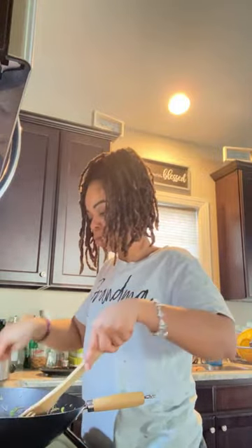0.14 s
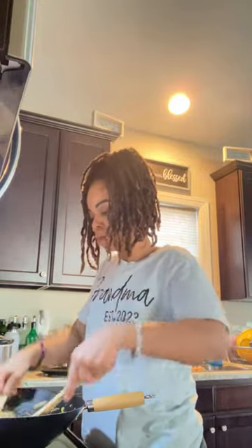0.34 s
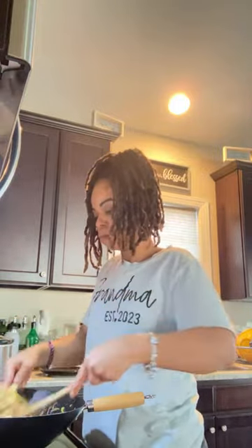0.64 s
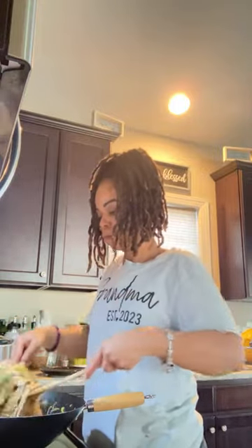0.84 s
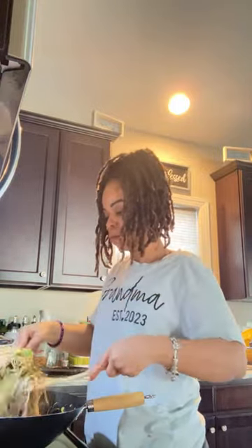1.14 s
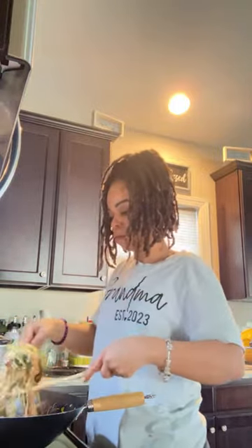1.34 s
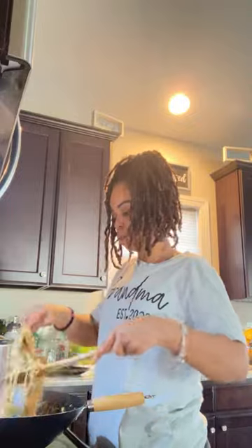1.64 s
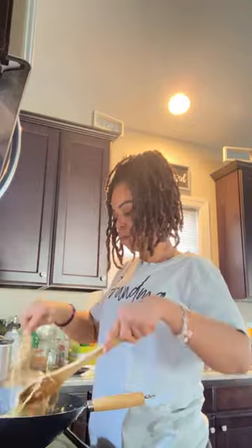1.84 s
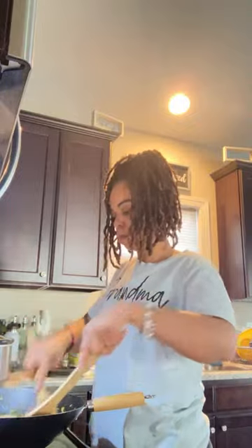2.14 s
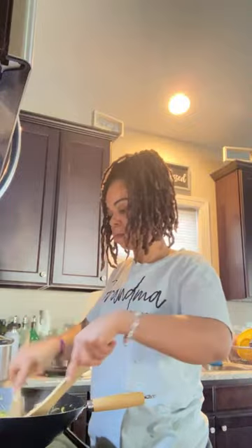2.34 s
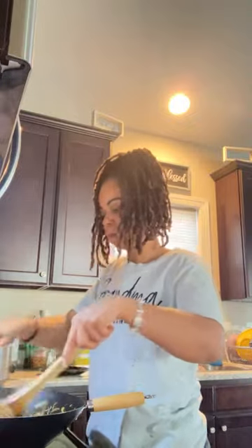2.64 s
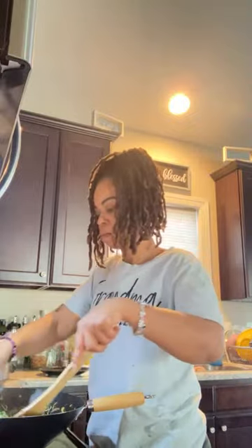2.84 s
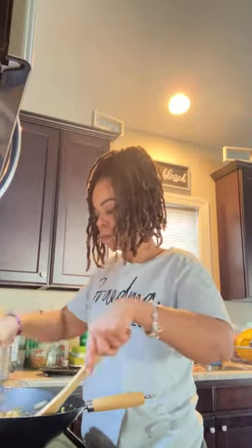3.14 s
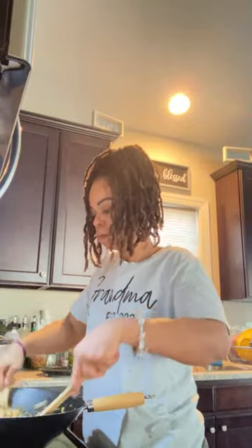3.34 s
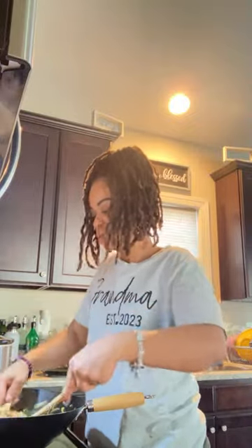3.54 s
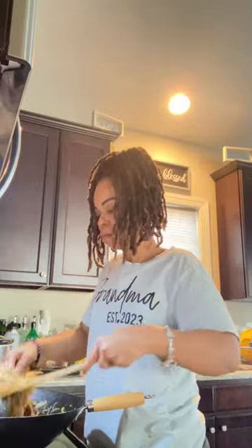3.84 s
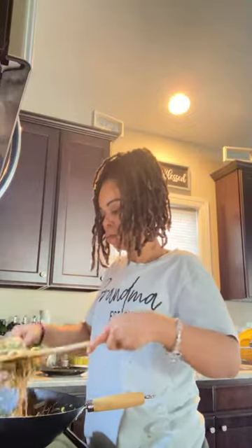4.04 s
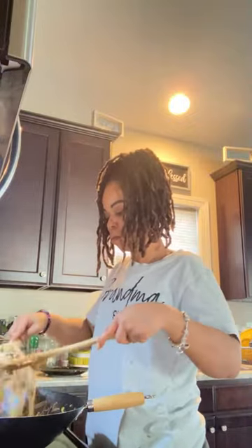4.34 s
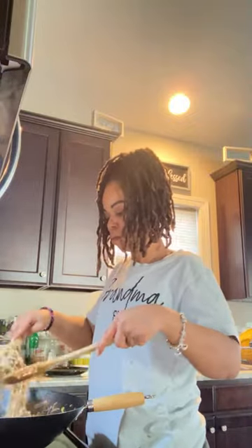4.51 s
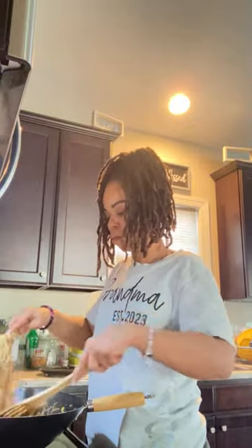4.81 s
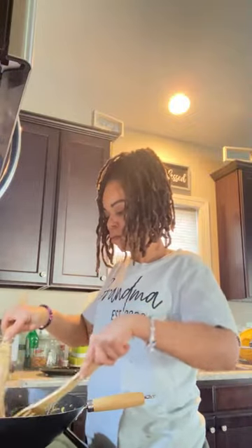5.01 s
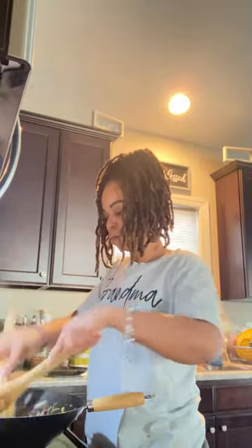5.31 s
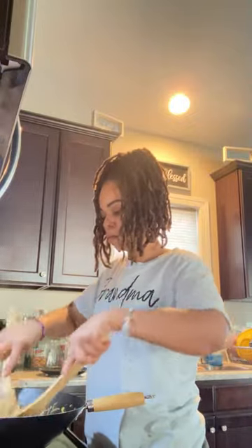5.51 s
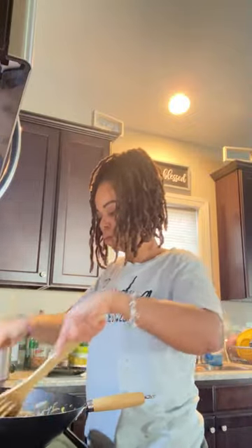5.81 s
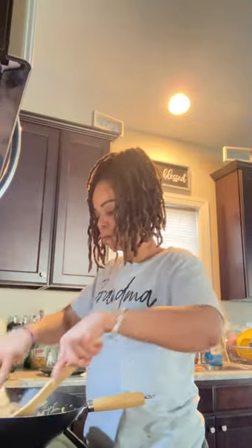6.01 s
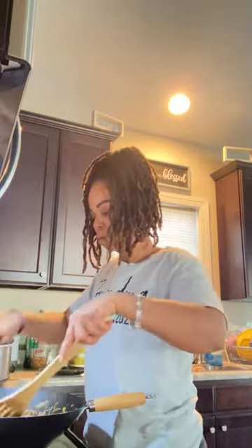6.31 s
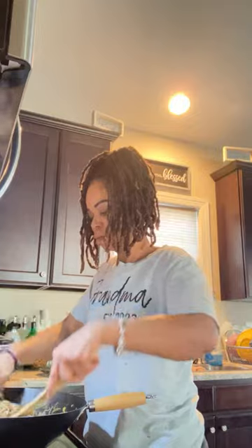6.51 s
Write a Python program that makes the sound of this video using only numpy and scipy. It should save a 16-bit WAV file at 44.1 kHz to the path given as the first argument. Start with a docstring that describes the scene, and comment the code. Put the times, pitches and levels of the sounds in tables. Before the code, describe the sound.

Wooden tools scrape, knock and toss noodles in a sizzling steel wok, with low pan thumps over a faint wavering hood-fan hum in a kitchen.

```python
"""Wooden tools stir and toss noodles in a hot steel wok, in a kitchen, heard by one microphone.
The tools knock rim, wood and bowl into damped modes and rub the steel as flickering coloured noise.
The pan rocks on its stand as short low tones; oil sizzles, fizzes and spits as bright noise.
Underneath, a hood fan hums on multiples of its shaft rate and its air rushes low.
The kitchen's short reverberation answers the knocks."""
import sys
import numpy as np
from scipy import signal
from scipy.fft import rfft, irfft, next_fast_len
from scipy.io import wavfile
from scipy.ndimage import uniform_filter1d, map_coordinates

SR = 44100
rng = np.random.default_rng(int(sys.argv[2]) if len(sys.argv) > 2 else 0)


def store_wav(level_fs):
    """Save 16-bit WAV to argv[1]."""
    pcm = np.round(np.clip(np.atleast_2d(level_fs), -1, 1) * 32767)
    wavfile.write(sys.argv[1], SR, pcm.T.astype(np.int16))


N = 293704


def amp(db):
    """Gain of a level in dB."""
    return 10 ** (np.asarray(db) / 20)


def unit(x):
    """x brought to rms 1."""
    return x / np.sqrt(np.mean(x ** 2) + 1e-20)


def summed(*gains):
    """Unrelated sounds add in power."""
    return np.sqrt(sum(g ** 2 for g in gains))


def along(points, hz):
    """Values at hz, read from (f/Hz, value) points on a log frequency axis."""
    f, value = np.transpose(points)
    return np.interp(np.log(hz + 1), np.log(f + 1), value)


def curves(rows):
    """One value per sample for each column after the time."""
    s, *columns = np.transpose(rows)
    return [np.interp(np.arange(N) / SR, s, column) for column in columns]


def wobble(rate):
    """A smooth random curve, rate knots a second."""
    knots = rng.standard_normal(int(N * rate / SR) + 4)
    return map_coordinates(knots, [np.arange(N) * rate / SR])


def filtered(x, response):
    """x shaped by a real or complex response of frequency."""
    m = next_fast_len(len(x) + 8192)
    return irfft(rfft(x, m) * response(np.fft.rfftfreq(m, 1 / SR)), m)[:len(x)]


def noise_band(length, centre_hz, fall_db):
    """Noise of rms 1 around a centre, falling by fall_db times the squared distance in octaves."""
    raw = rng.standard_normal(length)
    return unit(filtered(raw, lambda hz: amp(-fall_db * np.log2((hz + 1) / centre_hz) ** 2)))


def rush(spectrum, patchy_db, grit_db):
    """Coloured noise of rms 1 with patches of random gain; grit makes it grainy."""
    raw = rng.standard_normal(N) * amp(grit_db * wobble(400))
    z = signal.stft(raw, nperseg=512)[2]
    # patches: random gain smoothed over neighbouring frequencies, then over time
    field = uniform_filter1d(rng.standard_normal(z.shape), size=3, axis=0)
    field = uniform_filter1d(field, size=9, axis=1)
    x = signal.istft(z * amp(patchy_db * unit(field)), nperseg=512)[1][:N]
    return unit(filtered(x, lambda hz: amp(along(spectrum, hz))))


def sputter(count, life_ms, size_db):
    """Gain that jumps up at count random moments and dies back with a time constant of life_ms."""
    biggest_jump_db = 5.5  # cap on each single jump
    when, size = rng.random((count, 2)).T
    jump_db = np.minimum(-size_db * np.log(size), biggest_jump_db)
    kicks = np.bincount((when * N).astype(int), amp(jump_db) - 1, N)
    return 1 + signal.lfilter([1], [1, -np.exp(-1000 / (life_ms * SR))], kicks)


def ring(modes, centre_hz=1000, favour_db=0):
    """Sum of decaying modes at slightly new strengths; each octave from the centre costs favour_db."""
    scatter_db = 1.5  # from blow to blow
    longest_t60_s = 0.06  # the food damps every mode
    t = np.arange(SR // 10) / SR
    out = np.zeros(len(t))
    for hz, db, t60 in modes:
        strength_db = db - favour_db * abs(np.log2(hz / centre_hz)) + rng.normal(0, scatter_db)
        decay_db = -60 * t / min(t60, longest_t60_s)
        out += amp(strength_db + decay_db) * np.sin(2 * np.pi * (hz * t + rng.random()))
    return out


def add(track, s, sound):
    """Mix a sound in at s seconds."""
    part = track[round(s * SR):][:len(sound)]
    part += sound[:len(part)]


# Reverberation of the kitchen: f/Hz, t60/s
KITCHEN_DECAY = [(150, 0.4), (1000, 0.43), (5000, 0.71), (14000, 0.38)]


def room(x):
    """The kitchen's answer, 300 samples late; each frequency dies at its own speed."""
    hz, t, z = signal.stft(rng.standard_normal(SR // 2), SR, nperseg=256)
    decay = amp(-60 * t / along(KITCHEN_DECAY, hz)[:, None])
    tail = signal.istft(z * decay, SR, nperseg=256)[1]
    return signal.fftconvolve(np.pad(x, (300, 0)), tail / np.linalg.norm(tail))


# Wavering hum of the hood fan: t/s, level of the third shaft order/dB
FAN_LEVEL = [(0, -62.5), (.5, -60), (.65, -58.5), (1.5, -59), (1.65, -67), (2.1, -72.5), (2.5, -65),
             (3.1, -60), (3.8, -56.5), (4.1, -62.5), (4.5, -77), (4.8, -67), (5.1, -61), (5.5, -58),
             (5.75, -60), (5.95, -59.5), (6.66, -58.5)]
# Shaft orders of the hum: multiple of the shaft rate, level against the third order/dB
SHAFT_ORDERS = [(2, -11), (3, 0), (4, -15), (5, -15), (6, -16), (8, -23), (9, -24)]


def fan():
    """Shaft orders of the hood motor, each wavering in strength and phase; the third leads."""
    shaft_hz = 52.14
    level_db, = curves(FAN_LEVEL)
    turn = 2 * np.pi * shaft_hz * np.arange(N) / SR
    hum = np.zeros(N)
    for k, db in SHAFT_ORDERS:
        strength = amp(db + 1.4 * wobble(3.57))
        hum += strength * np.sin(k * turn + 0.11 * k * wobble(5))
    return np.sqrt(2) * amp(level_db) * hum


def shudder():
    """Gain of the low rumble that every knock sends through pan and stove."""
    rise_s, t60_s = 0.01, 0.47
    gains = []
    for s, *columns in KNOCK_EVENTS:
        since = np.clip(np.arange(N) / SR - s, 0, None)
        shudder_db = columns[4]
        gains.append(amp(shudder_db - 60 * since / t60_s) * (1 - np.exp(-since / rise_s)))
    return summed(*gains)


# Spectrum of the low air and rumble: f/Hz, relative level/dB
LOW_SPECTRUM = [(25, -27), (50, -10), (75, -7.5), (100, 1.5), (140, 1), (185, -12), (260, -5.5),
                (340, -13.5), (450, -20), (600, -25.5), (850, -34), (1200, -26.5), (2000, -60)]


def air_and_rumble():
    """The hood's low rush of air drifts around -59 dB; pan and stove rumble joins it after knocks."""
    air = amp(-59 + 1.6 * wobble(2.97))
    return summed(air, shudder()) * rush(LOW_SPECTRUM, patchy_db=1.9, grit_db=0.45)


# Firm strokes across the pan: t/s, length/s, scrape level/dB, wooden drag level/dB,
# stirred sizzle level/dB, stirred fizz level/dB, fading/(dB per s)
FIRM_STROKES = [(.26, 0.11, -56.5, -61, -74, -77, 6), (0.36, 0.035, -58, -63, -63, -65, 22),
                (0.427, .11, -60, -58.5, -66, -64, 30), (0.897, 0.036, -70, -64, -82, -79, 5),
                (2.193, 0.27, -55.5, -59, -56.5, -60, 35), (2.87, 0.24, -61, -63.5, -65.5, -67, 15),
                (3.27, 0.15, -52, -59.5, -56, -61, 46), (3.425, 0.17, -58, -54, -60.5, -59, 34),
                (5.461, 0.12, -61.5, -66, -63, -62.5, 5), (5.657, 0.03, -63, -82, -70, -70, 5),
                (5.989, .17, -61, -64.5, -62.5, -63, 17), (6.185, 0.027, -68, -70, -66, -66, 5),
                (6.491, .2, -57, -62, -64, -62, 16)]


def stroke_gains():
    """Gains of scrape, drag, sizzle and fizz: each stroke sets in, fades as it slows and lifts off."""
    attack_s, release_s = 0.018, 0.04  # linear rise; time constant of the lift-off
    t, gains = np.arange(N) / SR, np.zeros((4, N))
    for s, length, *levels_db, fading_db in FIRM_STROKES:
        shape = np.clip((t - s) / attack_s, 0, 1)
        shape = shape * amp(-fading_db * np.clip(t - s, 0, None))
        shape = shape * np.exp(-np.clip(t - s - length, 0, None) / release_s)
        gains = summed(gains, amp(levels_db)[:, None] * shape)
    return gains


# Oil frying louder or softer as food covers the hot steel, before the droplet bursts:
# t/s, sizzle level/dB, fizz level/dB
OIL_LEVELS = [(0, -66, -68), (.14, -71, -76), (.24, -68.5, -65), (.6, -65, -67), (1.2, -68, -66.5),
              (2.1, -66.5, -70), (2.55, -70.5, -72), (2.68, -66.5, -69), (2.8, -78.5, -76), (3.0, -80, -67),
              (3.2, -74, -80), (3.7, -67, -66.5), (4.2, -68.5, -68.5), (5.0, -69.5, -69.5),
              (5.17, -65.5, -66.5), (5.4, -72, -72), (5.72, -68.5, -68), (5.95, -73.5, -73),
              (6.3, -73, -68), (6.42, -71.5, -72), (6.66, -58, -61)]
# Spectrum of the sizzle: f/Hz, relative level/dB per Hz
SIZZLE_SPECTRUM = [(1760, -27), (3000, -13), (3310, -19), (4200, 1.5), (4920, -1), (7680, 0), (8470, 5),
                   (11000, 0), (14300, -23), (22000, -120)]
# Spectrum of the brighter fizz: f/Hz, relative level/dB
FIZZ_SPECTRUM = [(8000, -26), (10500, -6.5), (13000, -1), (15000, -7), (15600, -4), (15900, -5.5)]


def oil():
    """Frying oil sizzles and fizzes as coloured noise, louder under each firm stroke."""
    sizzle_db, fizz_db = curves(OIL_LEVELS)
    _, _, stirred, frothed = stroke_gains()
    bursts = sputter(count=90, life_ms=12.4, size_db=3.0)  # droplets burst, heard in both layers
    sizzle = summed(amp(sizzle_db), stirred) * rush(SIZZLE_SPECTRUM, patchy_db=2.0, grit_db=0.5)
    fizz = summed(amp(fizz_db), frothed) * rush(FIZZ_SPECTRUM, patchy_db=0.0, grit_db=2.0)
    return bursts * (sizzle + fizz)


# Oil spits: t/s, level before the envelope and halving/dB, centre f/Hz
SPIT_EVENTS = [(0.3711, -49, 8100), (2.621, -43, 12200), (2.6867, -46.5, 12900), (2.8145, -59, 11200),
               (2.9474, -45, 13000), (2.9694, -49, 12900), (3.0044, -48, 13000), (3.286, -39.5, 11800),
               (3.4094, -43, 13400), (3.5274, -46.5, 9560), (3.9414, -50, 10300), (4.2094, -57, 10900),
               (4.3594, -50.5, 8910), (4.8628, -57, 8980), (4.9644, -54, 11300), (3.69, -52, 10500),
               (4.4994, -56, 12900), (5.1294, -53, 13800), (5.4435, -51, 8620), (5.4755, -50, 8440),
               (5.684, -50, 9450), (5.776, -49.5, 11400), (5.845, -53.5, 10900), (5.995, -50, 12700),
               (6.2337, -52, 12000), (6.3085, -47, 11800), (6.3485, -50, 12900), (6.5126, -54, 10700)]


def spits():
    """Water flashing to steam in the oil: short bright hisses."""
    rise_s, fade_s = 0.0018, 0.012  # time constants
    out, t = np.zeros(N), np.arange(SR // 5) / SR
    envelope = (1 - np.exp(-t / rise_s)) * np.exp(-t / fade_s)
    for s, db, centre_hz in SPIT_EVENTS:
        hiss = noise_band(len(t), centre_hz, fall_db=24)
        add(out, s, amp(db) * hiss / 2 * envelope)
    return out


# The pan rocking on its stand: t/s, peak level/dB, pitch f/Hz, length/s
ROCK_EVENTS = [(.258, -35, 124.6, 0.17), (1.63, -55, 111, 0.13), (1.665, -46, 86, 0.053),
               (1.731, -52, 60, .05), (2.208, -33.5, 140, 0.05), (2.229, -31.5, 116.6, 0.12),
               (2.258, -38, 126.6, 0.34), (2.846, -39.5, 127.5, 0.16), (2.90, -39, 130.5, 0.3),
               (2.921, -29, 80, 0.11), (3.275, -28.5, 126, 0.051), (3.296, -41.5, 79, 0.27),
               (3.32, -36, 133.6, 0.09), (6.065, -40.5, 121, 0.042), (6.395, -32, 125.8, 0.26),
               (6.485, -32.5, 122, 0.048)]


def rocking():
    """The loaded pan rocks: each low boom swells up quickly and dies away within a fraction of a second."""
    out, t = np.zeros(N), np.arange(SR // 2) / SR
    for s, db, pitch_hz, length in ROCK_EVENTS:
        rise = (1 - np.exp(-t / (0.06 * length))) ** 2
        swell = rise * amp(-40 * (t / length) ** 0.8)
        add(out, s, amp(db) * swell / swell.max() * np.sin(2 * np.pi * pitch_hz * t))
    return out


# Light rubbing while the noodles are lifted and turned, before hand pressure and snags:
# t/s, scrape level/dB, wooden drag level/dB
LIGHT_RUB = [(0, -61.5, -63.5), (.6, -67, -65), (.95, -65.5, -65.5), (1.2, -68, -72), (2.0, -65.5, -71),
             (2.7, -64.5, -67.5), (3.7, -69, -68.5), (4.1, -69, -73.5), (5.0, -69, -71), (6.66, -67.5, -74)]
# Spectrum of the scrape on steel: f/Hz, relative level/dB
SCRAPE_SPECTRUM = [(1100, -3), (1400, 3), (1800, 0), (2800, -1), (4300, -3.5), (5500, -3), (8000, -15),
                   (11000, -36)]
# Spectrum of the duller wooden drag: f/Hz, relative level/dB
DRAG_SPECTRUM = [(400, -3), (550, -11), (850, 0.5), (1050, -2.5), (1300, -27.5), (1800, -30.5)]


def rubbing():
    """Tools rub the steel: scraping noise, partly through the rim's modes, and a duller wooden drag."""
    scrape_db, drag_db = curves(LIGHT_RUB)
    firm_scrape, firm_drag, _, _ = stroke_gains()
    pressure = amp(0.61 * wobble(12))  # uneven pressure of the hand
    rub = rush(SCRAPE_SPECTRUM, patchy_db=1.5, grit_db=1.5)
    driving = rush(SCRAPE_SPECTRUM, patchy_db=2.0, grit_db=2.5)
    steel = signal.fftconvolve(driving, ring(RIM_MODES))[:N]
    catches = sputter(count=200, life_ms=0.81, size_db=2.0)  # the edge snags on food and steel
    scrape = summed(amp(scrape_db), firm_scrape) * catches * unit(rub + 0.77 * unit(steel))
    drag = summed(amp(drag_db), firm_drag) * rush(DRAG_SPECTRUM, patchy_db=2.0, grit_db=2.5)
    return pressure * (scrape + drag)


# Modes of steel rim, wooden tool and bowl: f/Hz, relative level/dB, t60 before the food's damping/s
RIM_MODES = [(2390, -19, 0.012), (2356, 3.5, 0.032), (2830, 16, 0.0069), (2823, -6, 0.045),
             (3105, 2.5, 0.027), (3400, 0.5, 0.035), (3650, 2, 0.041), (4300, -4, 0.071),
             (4205, 17.5, 0.0086), (4500, -4, 0.086), (4280, -30, 0.011), (5150, -6, 0.034),
             (5830, -13, 0.013), (5630, 2, 0.029), (6240, -16, 0.037), (7400, -16.5, 0.0067),
             (8600, -8, 0.014)]
WOOD_MODES = [(470, -3, .03), (550, -5, .03), (635, -5, .03), (740, -7, .025), (843, 0, .04),
              (1010, -5, .025), (1300, -8, .02), (1455, -1, .035), (1665, -2, .035)]
BOWL_MODES = [(200, -2, 0.12), (249, -3, 0.092), (301, 1, 0.088), (376, 2, 0.029), (452, -8, 0.082)]
# Knocks on the pan: t/s, then level/dB of upper rim, lower rim, wooden knock, bowl thud and shudder,
# then centre f/Hz of upper rim, lower rim, knock and thud, then contact/ms (at least 0.5 is used)
KNOCK_EVENTS = [(0.2487, -32, -34.5, -37, -38, -43, 4300, 3100, 1550, 393, 1.6),
                (2.2032, -36.5, -36.5, -39.5, -37, -39.5, 3430, 2430, 1060, 200, 0.53),
                (2.3143, -52, -41.5, -35.5, -36, -48.5, 3560, 2700, 1430, 261, 1.2),
                (2.8881, -41, -53, -37, -26, -35.5, 4860, 2380, 775, 280, 0.7),
                (3.264, -24.5, -31.5, -37.5, -29, -42, 4440, 2320, 1000, 202, 1.5),
                (3.342, -34, -62, -68, -68, -48, 6300, 3240, 1040, 269, 0.61),
                (3.5826, -48.5, -51, -28, -39, -50, 4230, 3000, 750, 468, 3.5),
                (4.105, -64, -64, -50.5, -58, -62, 4260, 2350, 614, 400, 7.3),
                (6.055, -64, -51, -32, -38, -43.5, 4180, 2640, 704, 423, 2.7),
                (6.097, -68, -63, -44, -51, -55, 4180, 2660, 640, 400, 2.5),
                (6.3857, -53, -42, -42, -44.5, -43.5, 4250, 3170, 1710, 385, 0.4),
                (6.47, -53, -65, -55, -37.5, -44, 4150, 3330, 1040, 250, 2.5),
                (6.617, -40, -43, -53, -70, -54, 4500, 2970, 1680, 200, 0.51)]


def knocks():
    """Soft wood meets steel: the modes of rim, tool and bowl swell over the contact, then rattle on."""
    out, t = np.zeros(N), np.arange(SR // 4) / SR
    for (s, upper_db, lower_db, knock_db, thud_db, _,
         upper_hz, lower_hz, knock_hz, thud_hz, contact_ms) in KNOCK_EVENTS:
        rise = (1 - np.exp(-1000 * t / max(contact_ms, 0.5))) ** 2
        parts = [(upper_db, ring(RIM_MODES, upper_hz, favour_db=26)),
                 (lower_db, ring(RIM_MODES, lower_hz, favour_db=39)),
                 (knock_db, ring(WOOD_MODES, knock_hz, favour_db=20)),
                 (thud_db, ring(BOWL_MODES, thud_hz, favour_db=11.5))]
        blow = np.zeros(len(t))
        for db, response in parts:
            struck = rise * np.pad(response, (0, len(t) - len(response)))
            # rattle under the blow: noise rung through the same modes
            rattle = signal.fftconvolve(rng.standard_normal(2 * len(t)), response)
            rattle = unit(rattle[len(t):2 * len(t)])
            rattle_gain = amp(-17 - 60 * t / 0.23) * rise
            blow += amp(db) * (struck / np.abs(struck).max() + rattle_gain * rattle)
        # bright noise around the upper rim
        crack = noise_band(len(t), upper_hz, fall_db=8)
        blow += amp(upper_db - 5.5 - 60 * t / 0.06) * rise * crack
        # dull noise of the tool, centred below its knock
        clunk = noise_band(len(t), 0.67 * knock_hz, fall_db=14)
        blow += amp(knock_db - 14 - 60 * t / 0.18) * rise * clunk
        add(out, s, blow)
        add(out, s, amp(-12.5) * room(blow))
    return out


def scene():
    """Everything at one microphone, which feeds both channels."""
    background = fan() + air_and_rumble()
    wok = oil() + spits() + rocking() + rubbing() + knocks()
    return np.tile(background + wok, (2, 1))


def record(dry):
    """The microphone cuts the deep bass and keeps nothing from its band limit up."""
    corner_hz, top_hz = 55, 15780  # corner of each of four equal low-cut stages; band limit

    def response(hz):
        low_cut = (1j * hz / (corner_hz + 1j * hz)) ** 4
        return low_cut * (hz < top_hz)

    return np.tile(filtered(dry[0], response), (2, 1))


dry = scene()
out = record(dry)
store_wav(out)
```